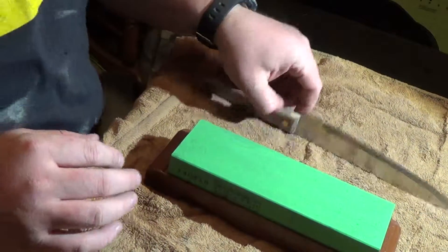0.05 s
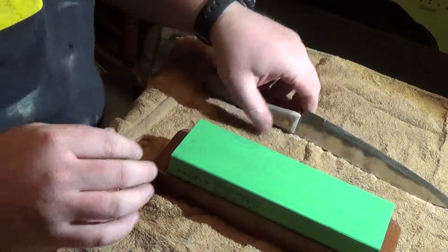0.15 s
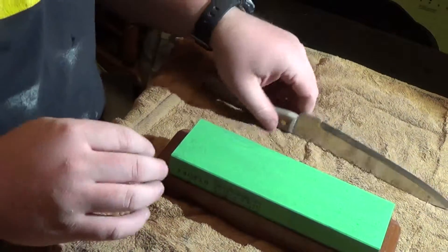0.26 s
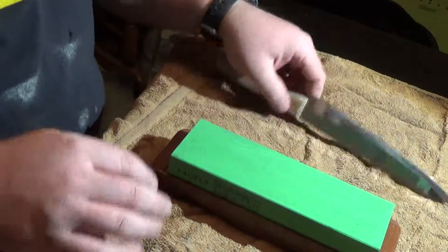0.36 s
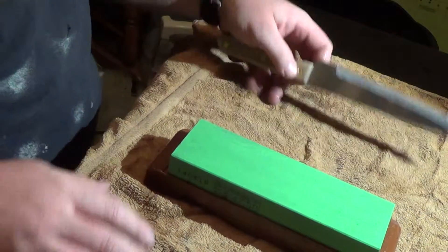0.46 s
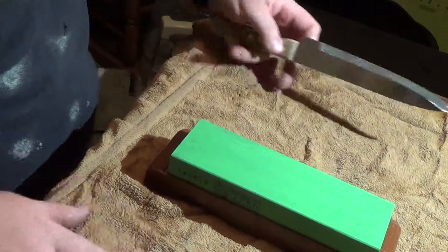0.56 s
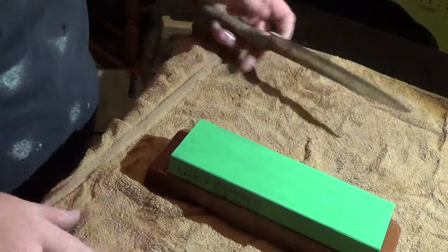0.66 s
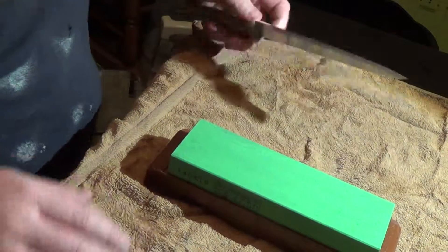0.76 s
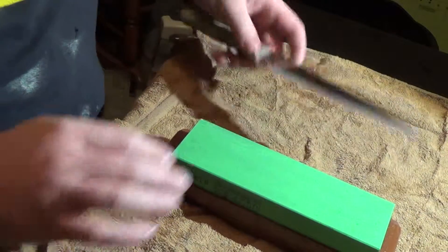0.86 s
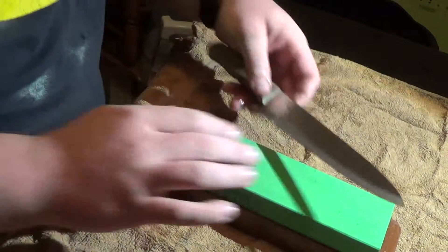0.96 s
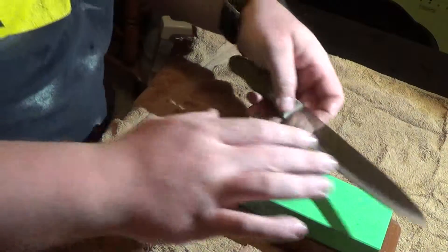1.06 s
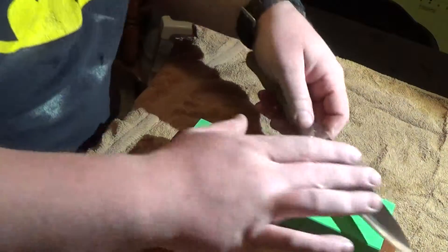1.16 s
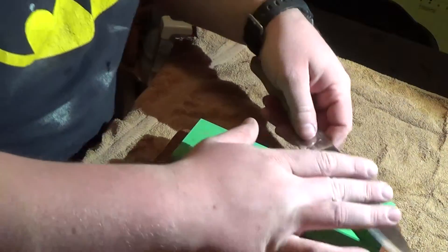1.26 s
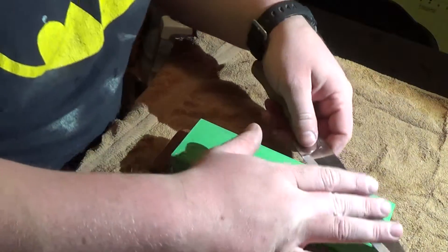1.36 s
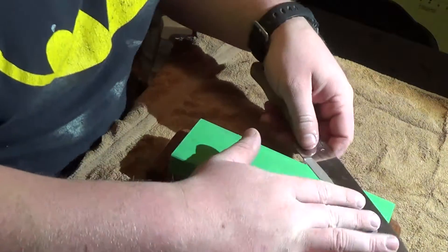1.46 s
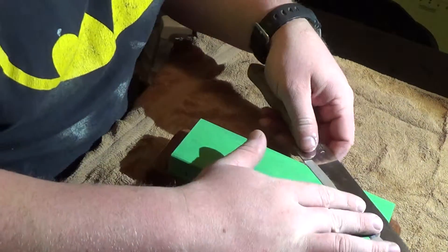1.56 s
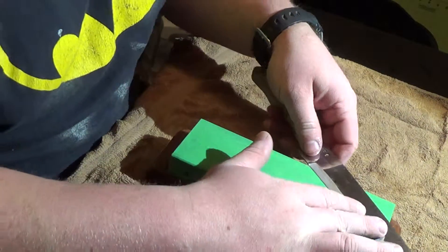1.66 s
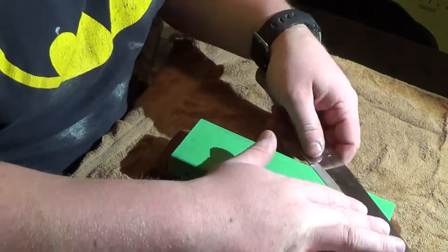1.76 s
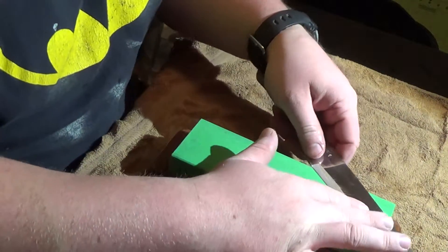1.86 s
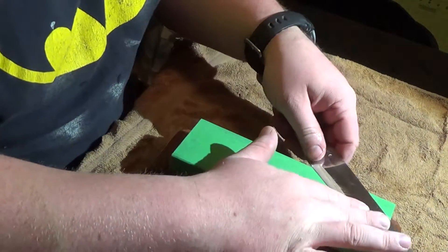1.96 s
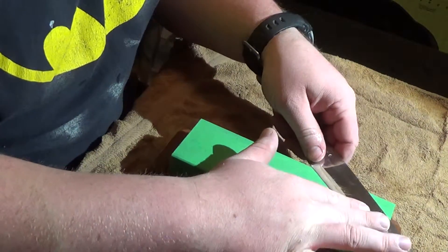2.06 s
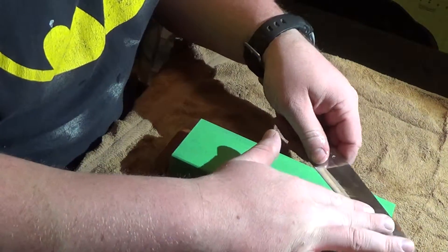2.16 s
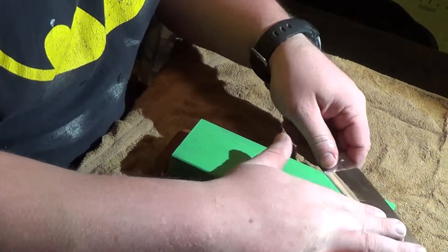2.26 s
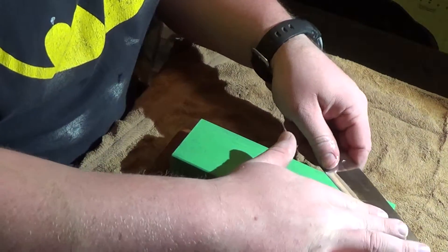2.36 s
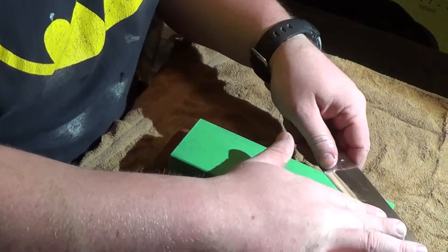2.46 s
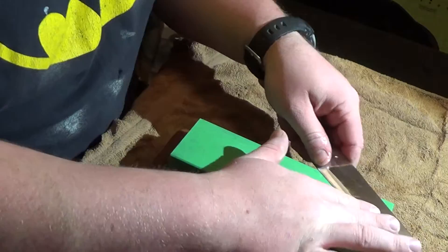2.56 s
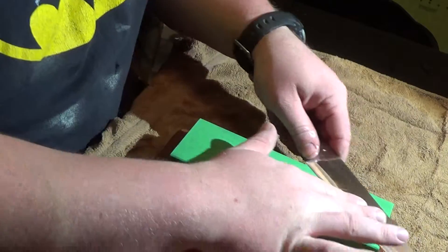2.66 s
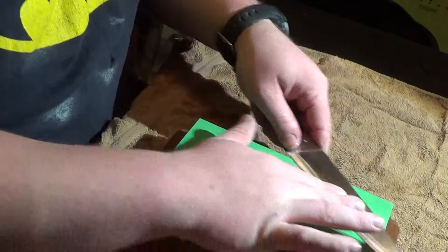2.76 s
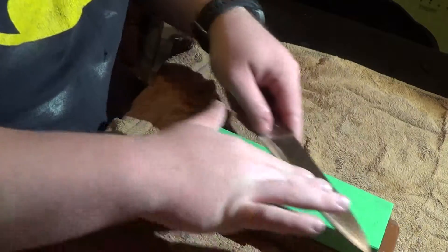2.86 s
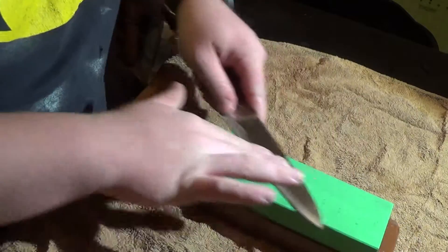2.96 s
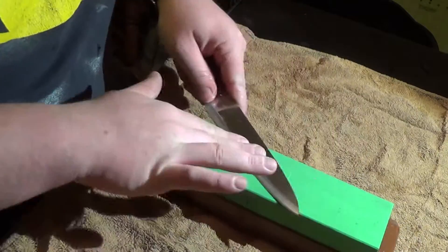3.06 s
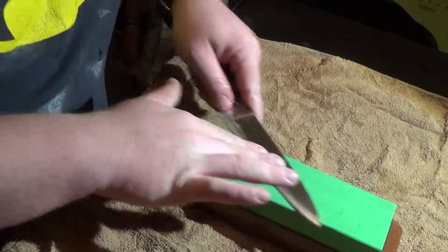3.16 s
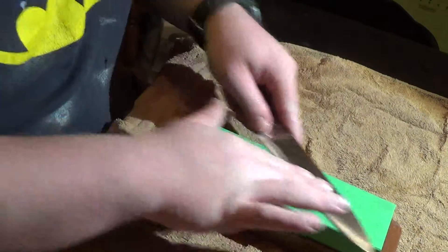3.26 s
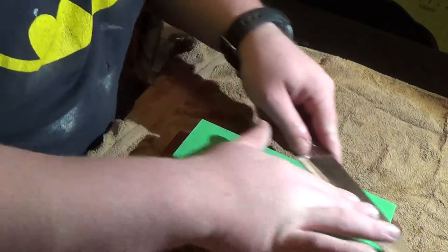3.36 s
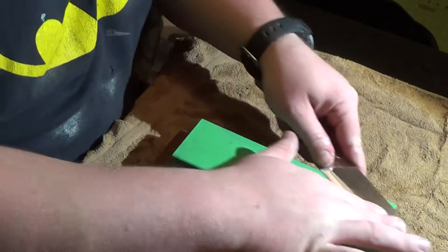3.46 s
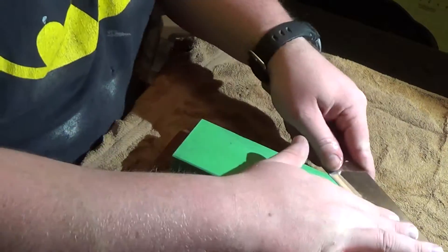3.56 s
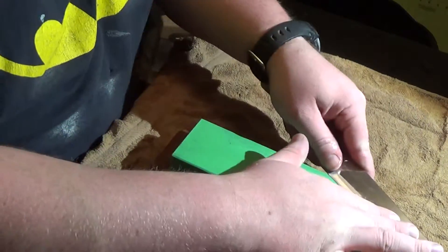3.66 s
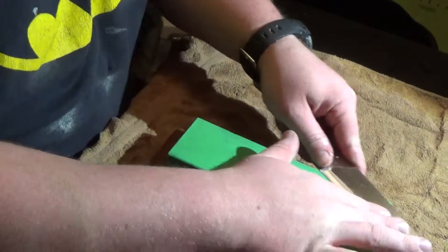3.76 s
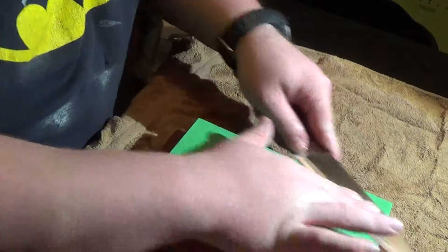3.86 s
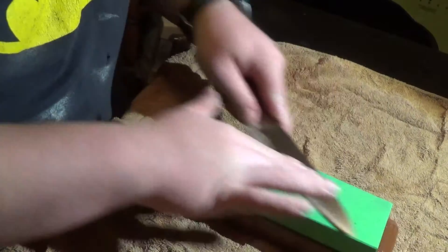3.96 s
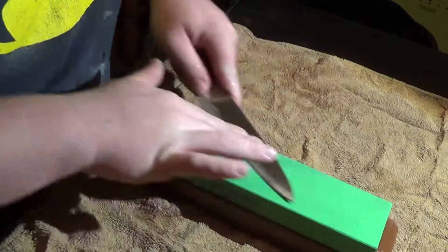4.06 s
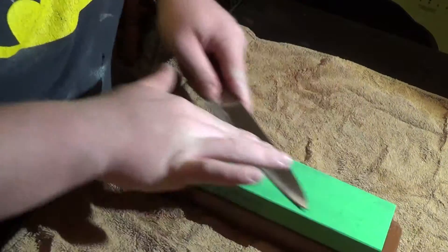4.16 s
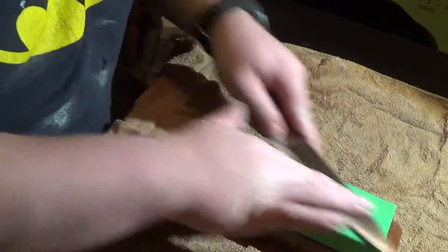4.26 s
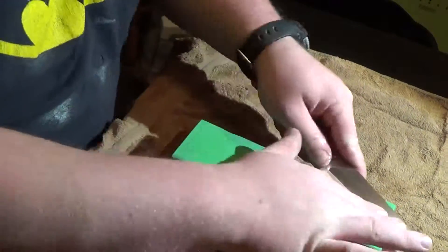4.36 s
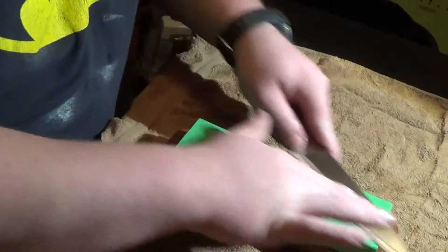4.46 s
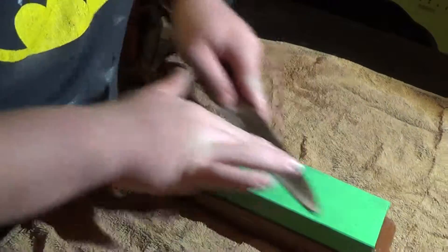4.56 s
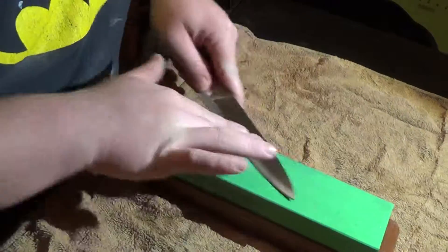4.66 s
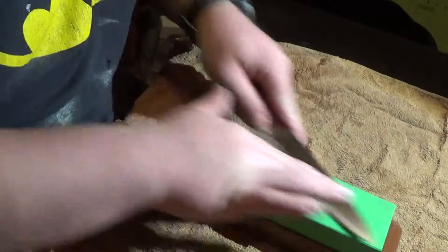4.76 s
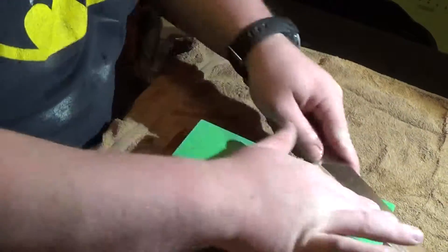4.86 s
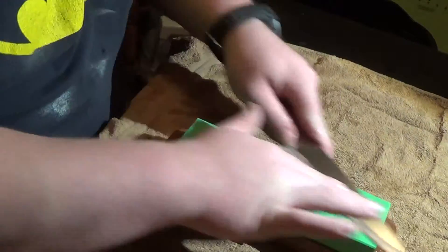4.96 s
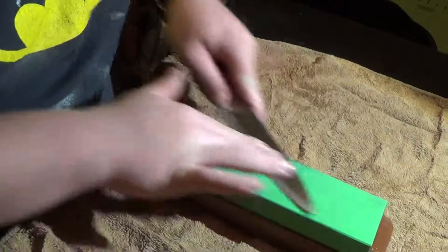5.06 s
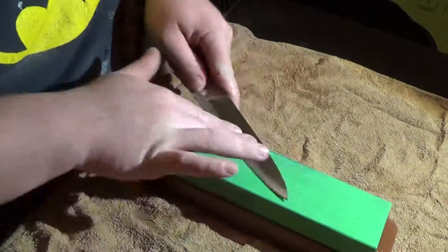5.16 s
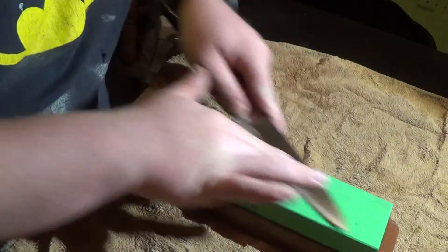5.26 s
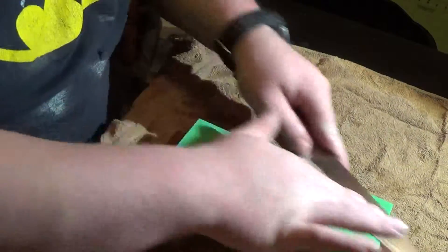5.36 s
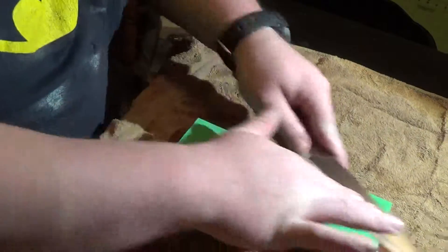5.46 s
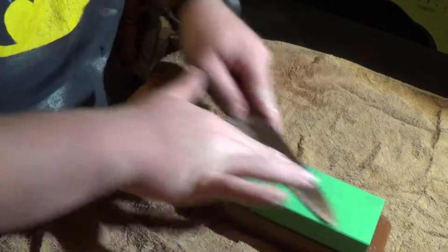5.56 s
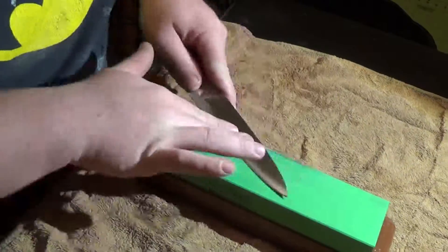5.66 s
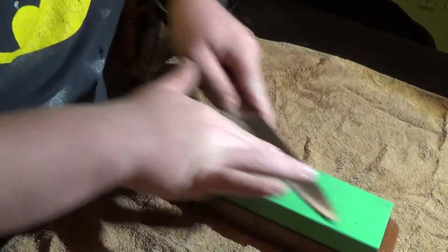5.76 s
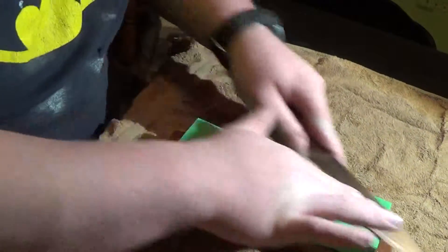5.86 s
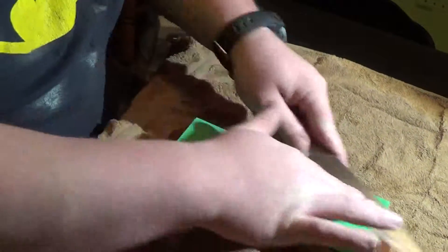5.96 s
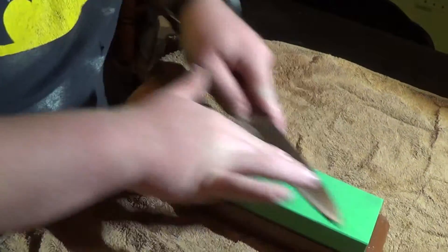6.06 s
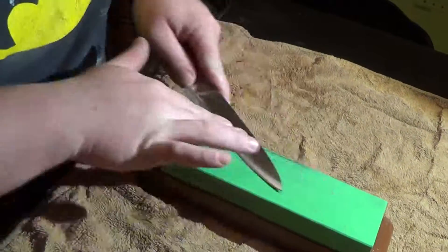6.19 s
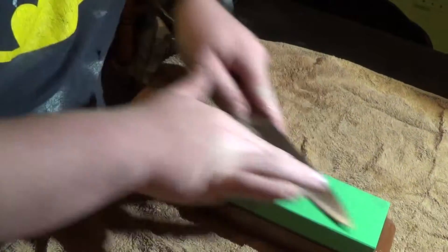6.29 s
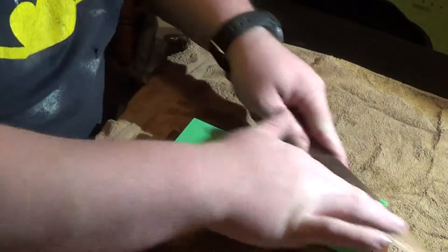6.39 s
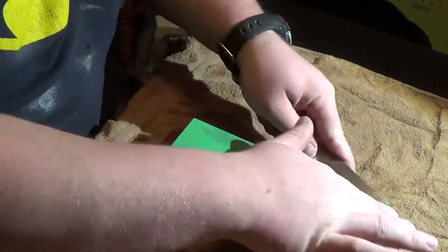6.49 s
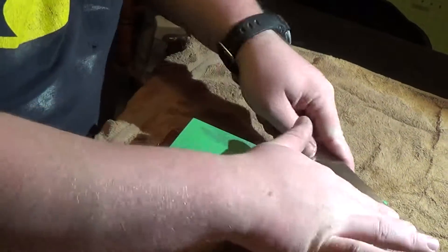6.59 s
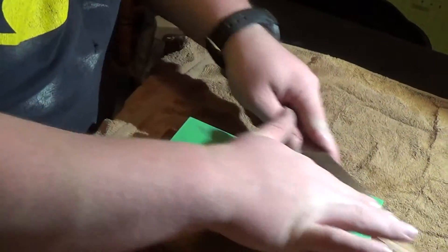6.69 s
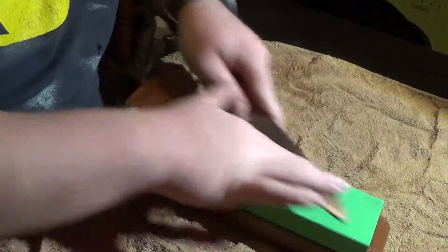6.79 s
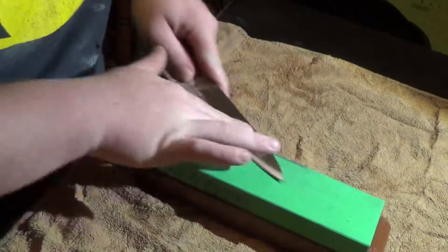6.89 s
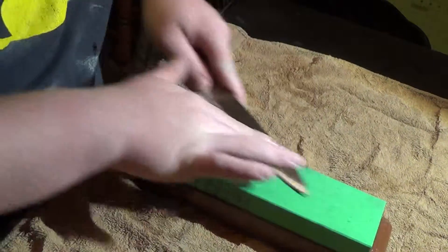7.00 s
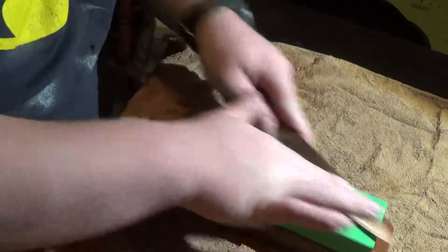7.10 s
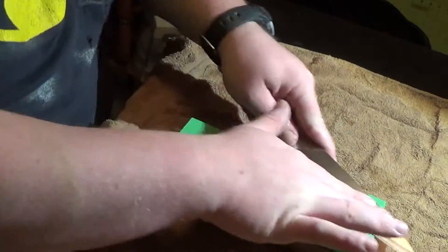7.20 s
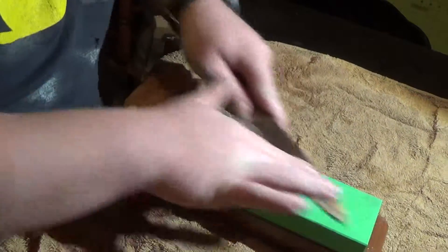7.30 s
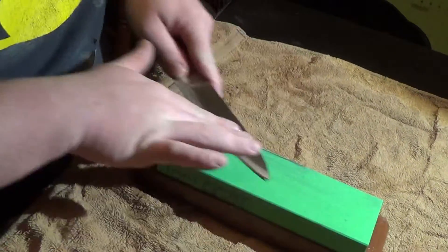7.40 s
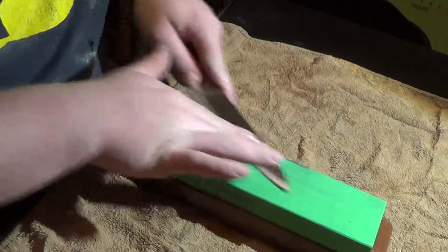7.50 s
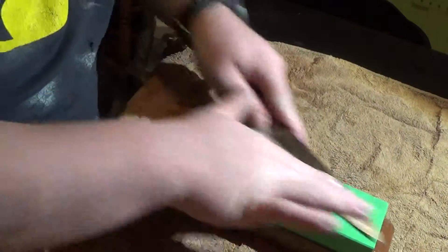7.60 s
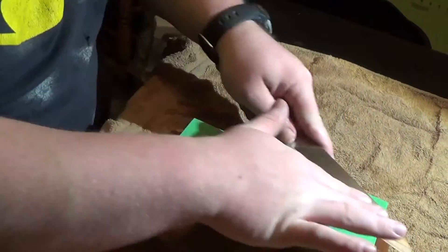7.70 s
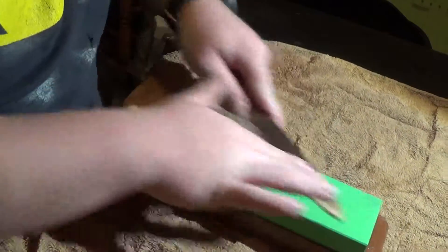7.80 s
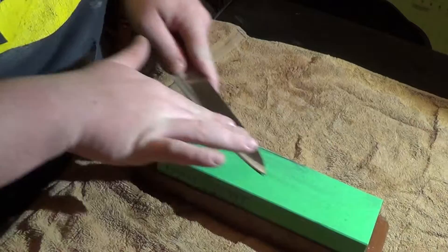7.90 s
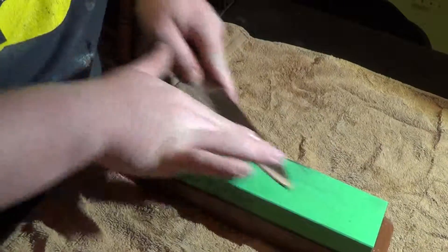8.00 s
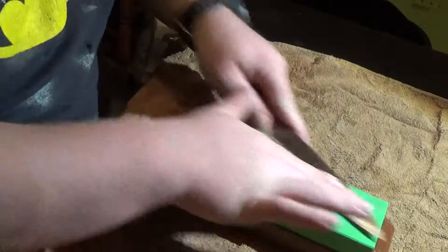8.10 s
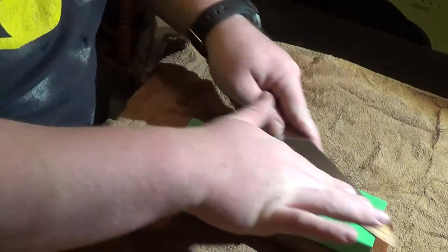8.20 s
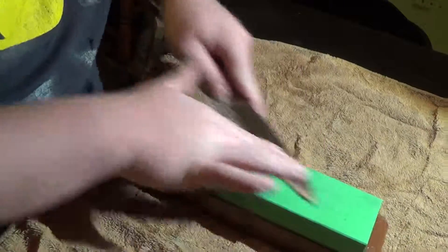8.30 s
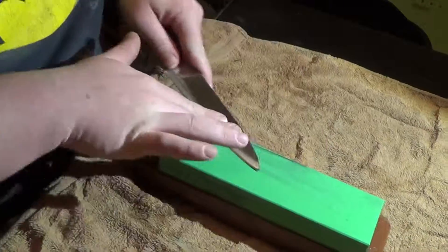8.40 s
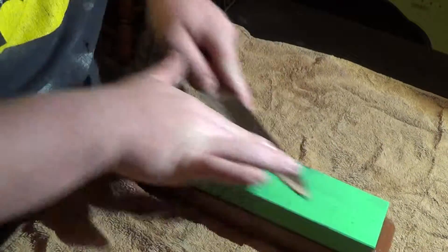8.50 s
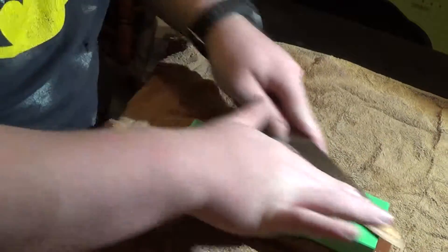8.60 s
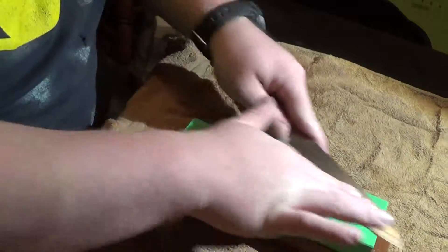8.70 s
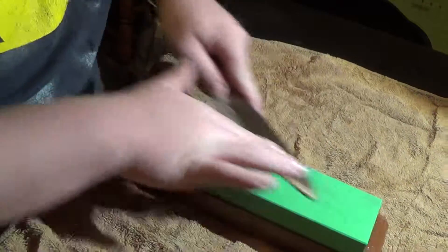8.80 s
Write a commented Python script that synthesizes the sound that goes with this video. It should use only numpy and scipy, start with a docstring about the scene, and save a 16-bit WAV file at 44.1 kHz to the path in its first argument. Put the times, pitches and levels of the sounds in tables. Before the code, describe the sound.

Quiet cloth brushing and small metallic ticks come first, then a hard, short clack of blade on stone. A few long, swelling rasps follow with gaps between them, then brisk, regular back-and-forth scraping over coarse grit. The steel hisses and rings drily, its tone sliding up and down, with low stone rumble and occasional light knocks beneath. Close microphone, small room with a short reflection and low hum.

```python
"""A small room with a low hum, close to the microphone: a kitchen knife is lifted off a towel, set on a
coarse whetstone with a clack and stroked back and forth, slowly, then twice a second.
Noise of fracturing grit scrapes the steel; the blade's resonances glide as the contact travels between
heel and tip. Coloured noise makes the rumble of stone and table; damped sines make the clack.
The walls answer with a short tail of decaying noise."""
import sys
import numpy as np
from scipy import signal
from scipy.fft import rfft, irfft, next_fast_len
from scipy.io import wavfile
from scipy.ndimage import uniform_filter1d, map_coordinates

SR = 44100
rng = np.random.default_rng(int(sys.argv[2]) if len(sys.argv) > 2 else 0)


def unload_audio(sound):
    """Save the sound as a 16-bit wav file, at the path given as the first command line argument."""
    columns = np.transpose(np.atleast_2d(sound))
    # keep every value between -1 and 1, then stretch to whole-number steps
    steps = np.round(np.clip(columns, -1, 1) * 32767)
    wavfile.write(sys.argv[1], SR, steps.astype(np.int16))


N = 389844


def amp(db):
    """Decibels to gain."""
    return 10 ** (np.asarray(db) / 20)


def unit(x):
    """Scaled to rms 1."""
    return x / np.sqrt(np.mean(x ** 2) + 1e-20)


def along(points, hz):
    """(frequency, value) points read on a log frequency axis."""
    f, v = np.transpose(points)
    return np.interp(np.log(hz + 1), np.log(f + 1), v)


def curves(rows):
    """One value per sample for each column after the time."""
    rows = np.asarray(rows)
    in_order = rows[np.argsort(rows[:, 0], kind="stable")]
    s, *cols = in_order.T
    return [np.interp(np.arange(N) / SR, s, c) for c in cols]


def wobble(rate):
    """A smooth random curve, rate knots a second."""
    knots = rng.standard_normal(int(N * rate / SR) + 4)
    return map_coordinates(knots, [np.arange(N) * rate / SR])


def filtered(x, response):
    """x times a response of frequency."""
    m = next_fast_len(N + 8192)
    return irfft(rfft(x, m) * response(np.fft.rfftfreq(m, 1 / SR)), m)[..., :N]


def coloured(spectrum):
    """Noise of rms 1 with the given spectrum."""
    return unit(filtered(rng.standard_normal(N), lambda hz: amp(along(spectrum, hz))))


def levelled(x):
    """x with its slow swells evened out to rms 1 over about 50 ms."""
    return x / np.sqrt(np.abs(uniform_filter1d(x ** 2, size=2200)) + 1e-12)


def band(x, low_hz, high_hz):
    """One steep-sided band of x at a steady rms of 1."""
    return levelled(filtered(x, lambda hz: 1 / (1 + (hz / high_hz) ** 24) - 1 / (1 + (hz / low_hz) ** 24)))


def add(track, s, sound):
    """Mix a short sound into the track at time s."""
    part = track[round(s * SR):][:len(sound)]
    part += sound[:len(part)]


def ramp(t, length):
    """A quarter sine from 0 to 1 over the given length."""
    return np.sin(np.pi / 2 * np.clip(t / length, 0, 1))


def swells(rows):
    """Smooth rises and falls: one gain curve for each dB column after start and length."""
    out = np.zeros((len(rows[0]) - 2, N))
    for s, length, *levels_db in rows:
        arch = np.sin(np.linspace(0, np.pi, round(length * SR)))
        for track, db in zip(out, levels_db):
            add(track, max(s, 0), amp(db) * arch)
    return out


def room(x):
    """The walls answer each side differently, each frequency dying at its own speed."""
    # decay of the tail: (frequency [Hz], time to fall 60 dB [s])
    decay_times = [(150, 0.15), (600, 0.24), (3500, 0.26), (10000, 0.3), (16000, 0.4)]
    # colour of the reflections: (frequency [Hz], relative level [dB])
    wall_colour = [(40, -26), (120, -19.5), (300, 0), (1400, -0.5), (3000, -7), (6000, -6), (9000, -10.5),
                   (16000, -54)]
    hz, t, z = signal.stft(rng.standard_normal((2, SR // 2)), SR, nperseg=256)
    decay = amp(-60 * t / along(decay_times, hz)[:, None])
    tail = signal.istft(z * decay, SR, nperseg=256)[1]
    tail = tail / np.linalg.norm(tail[0])
    delayed = np.pad(x, (300, 0))[None]  # about 7 ms before the walls answer
    wet = signal.fftconvolve(delayed, tail, axes=1)[:, :N]
    return filtered(wet, lambda f: amp(along(wall_colour, f)))


def background():
    """Room air, a machine's low hum as a slightly unsteady sine, and a faint electronic whine."""
    # hum: (time [s], rms level before a 2.5 dB cut [dB])
    hum_level = [(0.0, -50.5), (0.57, -45.5), (1.08, -54), (1.75, -51.5), (2.39, -70), (8.84, -54)]
    # colour of the room air: (frequency [Hz], relative level [dB])
    air_colour = [(12, -37), (20, -1), (62, -6.5), (164, -12), (733, -18), (796, -17.5), (865, -20),
                  (1050, -19.5), (1350, -18), (2100, -21), (15000, -31)]
    t = np.arange(N) / SR
    hum_gain = amp(curves(hum_level)[0] - 2.5) * np.sqrt(2)
    hum = hum_gain * np.sin(2 * np.pi * 43.1 * t + 0.13 * wobble(5))
    whine = amp(-66) * np.sin(2 * np.pi * 15735 * t)
    air = amp(-54) * coloured(air_colour)
    return hum + whine + air + room(air)


def handling():
    """The knife leaves the towel and slides in the fingers: swells of two noise colours."""
    # knife and hands brush the towel: (start [s], length [s], level [dB])
    rustles = [(0, 0.15, -63), (.28, 0.56, -56.5), (.645, .06, -52), (1.1, 0.35, -59)]
    # fingers slide on the steel: (start [s], length [s], level [dB])
    slips = [(0, .14, -60.5), (.24, 0.13, -63), (.5, 0.27, -56.5), (.82, 0.059, -51), (.95, 0.11, -51)]
    # colour of the towel: (frequency [Hz], relative level [dB])
    towel_colour = [(150, -5), (400, 2), (1500, -2), (2500, -3), (5000, -12), (11000, -21), (16000, -27)]
    # colour of skin on steel: (frequency [Hz], relative level [dB])
    slide_colour = [(3000, -40), (7000, -12), (9000, 2), (11500, -3), (14000, -16), (16000, -21)]
    unsteady = amp(1.5 * wobble(91.2))
    brushing = swells(rustles)[0] * coloured(towel_colour)
    sliding = swells(slips)[0] * coloured(slide_colour)
    return unsteady * (brushing + sliding)


def taps(rows, sharpness):
    """Light contacts: short bursts of noise around one pitch."""
    out, t = np.zeros(N), np.arange(SR // 4) / SR
    for s, db, hz, t60 in rows:
        burst = rng.standard_normal(len(t)) * amp(-60 * t / t60)
        tap = signal.lfilter(*signal.iirpeak(hz, sharpness, SR), burst)
        add(out, s, amp(db) * tap / np.abs(tap).max())
    return out


def knocks(crack_db, crack_t60, chatter_db, chatter_t60):
    """The blade hits the stone: modes damped by the hand, a crack, and brief chatter on the grit."""
    # blows on the stone: (time [s], peak level [dB], tilt below 3 kHz [dB], tilt above 5 kHz [dB])
    blows = [(1.378, -7.5, -1.5, 3), (4.384, -13, -9, -15), (4.404, -12.5, 0, 1), (4.913, -17, -3, 2),
             (7.211, -20, -25, -18), (7.712, -19.5, -27, 16)]
    # struck blade on its stone: (frequency [Hz], level before the tilts [dB], time to fall 60 dB [s])
    struck_modes = [(330, -21, .04), (425, -17, .07), (700, -22, .025), (1050, -15, .025), (1500, -15, .03),
                    (1900, -9, .025), (2143, -5, .028), (2420, -7, .025), (2750, -9, .025), (3817, 0, .028),
                    (4064, -5, .02), (4753, -3, .025), (5800, -5, .02), (7300, -12, .02),
                    (10400, -13, .025)]
    out, t = np.zeros(N), np.arange(SR // 2) / SR
    hz, level, t60 = np.transpose(struck_modes)[:, :, None]
    crack_filter = signal.butter(2, 7940, fs=SR)  # the crack dulls above this frequency
    for s, db, low_db, bright_db in blows:
        tilt = low_db * (hz < 3000) + bright_db * (hz > 5000)
        strength = amp(level + tilt + rng.normal(0, 1, hz.shape))
        tones = np.sin(2 * np.pi * (hz * t + rng.random(hz.shape)))
        ring = np.sum(strength * amp(-60 * t / t60) * tones, axis=0)
        chatter = amp(chatter_db - 60 * t / chatter_t60) * rng.standard_normal(len(t))
        crack_noise = signal.lfilter(*crack_filter, rng.standard_normal(len(t)))
        crack = amp(crack_db - 60 * t / crack_t60) * crack_noise
        hit = ring + signal.fftconvolve(ring, chatter)[:len(t)] + crack
        add(out, s, amp(db) * hit / np.abs(hit).max())
    return out


def hand():
    """Every stroke speeds up, runs its course and stops; speed and pressure set the gains and the pitch."""
    # The main bending mode rises as less steel overhangs the stone, and falls again on the way back.
    # pulls towards the body: (start [s], length [s], attack [s], release [s], hiss [dB], ring [dB],
    # drag [dB], growth of pressure [dB], mode from [Hz], mode to [Hz], glide lag [power])
    pulls = [(1.52, .33, 0.19, 0.22, -49.5, -45, -57, -10, 4150, 4800, 0.95),
             (2.525, 0.61, 0.58, 0.16, -21, -21, -47.5, 5, 2470, 4010, 1.24),
             (3.755, 0.42, 0.29, 0.16, -22, -23.5, -48.5, 7, 2380, 3940, 0.92),
             (4.43, .268, 0.091, 0.043, -20, -24, -47, 0, 2100, 4600, 0.81),
             (4.948, 0.26, 0.12, 0.057, -18.5, -23.5, -46.5, 0.5, 2220, 4850, 0.88),
             (5.47, 0.27, 0.04, .045, -21, -26, -48.5, 1.5, 2160, 4680, 0.72),
             (5.972, .27, 0.086, 0.036, -20.5, -27, -49, -3, 2120, 5160, .95),
             (6.664, .321, 0.17, 0.026, -23, -26.5, -51.5, -8.5, 2530, 5300, 1.22),
             (7.228, 0.27, 0.027, 0.041, -20.5, -26.5, -52, 3.5, 2600, 6270, 1.35),
             (7.73, 0.27, 0.036, 0.026, -22, -29, -52, 3.5, 2700, 6330, 1.17),
             (8.217, 0.25, 0.054, 0.035, -21.5, -26.5, -52, 8, 2500, 6400, 1.26),
             (8.707, 0.22, 0.047, 0.034, -22, -28, -51.5, -4.5, 2460, 6500, 1.5)]
    # pushes away from the body: same columns and units as the pulls
    pushes = [(1.38, 0.15, 0.028, 0.055, -41.5, -38.5, -58, 3, 3750, 3730, 1),
              (2.11, 0.26, 0.24, .12, -26, -28, -51.5, 18, 2500, 2550, 1),
              (3.13, 0.49, 0.031, 0.23, -19, -21.5, -46, 8, 4100, 2430, 0.67),
              (4.17, .267, 0.012, 0.034, -19, -26.5, -46, 3.5, 3770, 2068, 0.97),
              (4.697, .26, 0.013, 0.089, -20, -27, -46.5, 2, 4430, 2210, 0.89),
              (5.207, .27, 0.028, 0.042, -18, -25.5, -51, -2.5, 5300, 2346, 0.95),
              (5.732, .25, .018, 0.04, -18.5, -26, -48.5, 2, 4260, 2260, 0.89),
              (6.239, 0.28, 0.016, 0.094, -22.5, -29.5, -48.5, 0, 5060, 2100, 0.86),
              (6.983, 0.25, .012, 0.03, -23.5, -31.5, -52.5, 0, 5530, 2450, 0.98),
              (7.497, 0.24, .014, 0.031, -18, -26, -50, 0, 6360, 2530, 0.93),
              (7.995, 0.24, 0.011, 0.12, -21.5, -28, -50, -7, 6660, 2440, 1.02),
              (8.466, 0.26, 0.021, 0.033, -20, -27, -52, -3, 7080, 2520, 1.11)]
    # course of every pull: (share of the stroke [0-1], share of the travel [0-1], hiss [dB], ring [dB],
    # grinding [dB], rumble [dB])
    pull_course = [(0, 0, -6, 0, 8, -0.5), (.2, 0.214, -2.5, 1, 3, -3), (.4, 0.684, -2.5, 0.5, -2, -9.5),
                   (.6, 0.92, 0, -1.5, -2.5, -5), (.8, .98, 0.5, -4, -3, -7), (1, 1, -10, -7.5, 0.5, -4)]
    # course of every push: same columns and units
    push_course = [(0, 0.18, -9.5, -5, -5, 0.5), (0.132, 0, -1.5, -1.5, -.5, -3),
                   (.33, 0.5, -2.5, -5, -2.5, -6), (.48, .79, -9.5, -6, 0.5, -8.5),
                   (.67, 0.97, -12.5, -9.5, 2, -4), (.84, .99, -11, -8.5, 1.5, -4.5),
                   (1, 0.97, -20, -13, 2, -2.5)]
    grind_law, rumble_law = 0.46, 0.35  # powers of the hand's speed; hiss and ring are proportional to it
    brisk_s, jerk_law = 0.24, 0.92  # a stroke longer than this shakes the table less, by this power
    gains, bending = np.zeros((4, N)), []
    for rows, course in ((pulls, pull_course), (pushes, push_course)):
        shares, way, *columns = np.transpose(course)
        for s, length, attack, release, hiss_db, ring_db, drag_db, press_db, from_hz, to_hz, lag in rows:
            t = np.arange(round(length * SR)) / SR
            done = t / length
            travel = np.interp(done ** lag, shares, way)
            hiss, ring, grind, rumble = (np.interp(done, shares, c) for c in columns)
            speed = ramp(t, attack) * ramp(length - t, release)
            bite = speed * amp(press_db * (done - .5))
            jerk = min(1, brisk_s / length) ** jerk_law
            layers = (bite * amp(hiss_db + hiss),
                      bite * amp(ring_db + ring),
                      speed ** grind_law * amp(drag_db + grind),
                      jerk * speed ** rumble_law * amp(drag_db + rumble))
            for track, layer in zip(gains, layers):
                add(track, s, layer)
            glide_hz = from_hz + (to_hz - from_hz) * travel
            bending.append(np.column_stack([s + t, glide_hz])[::64])
    return (*gains, curves(np.vstack(bending))[0])


def blade(force, bending):
    """The force heard through the blade's resonances, which shift with the overhang."""
    # four bending modes, one a row: (frequency [Hz] at each of five overhangs, long to short)
    mode_paths = [(800, 1150, 1550, 2200, 3050), (2250, 2600, 3400, 4600, 6500),
                  (4550, 4650, 5050, 6600, 8800), (5700, 6000, 6800, 8900, 11800)]
    # how each bending mode sounds, before the contrast: (width [Hz], level at long overhang [dB],
    # level at short overhang [dB], extra while the tip is worked [dB])
    mode_shapes = [(120, 18, -6, 3), (200, 18, 11, 1), (220, 18, 5, 1), (300, 14, 3, 2)]
    # resonances that stay put, before the contrast: (frequency [Hz], width [Hz],
    # level at long overhang [dB], level at short overhang [dB], extra while the tip is worked [dB])
    steady_modes = [(1580, 80, 17.5, -4.5, 1), (1820, 31, 22, -7, -11), (3100, 220, -33.5, 3.5, 5.5),
                    (3650, 560, 26.5, -4.5, -2), (4620, 220, 21, -2, 1.5), (5990, 680, 20.5, 3, -5),
                    (10440, 860, 13.5, 20.5, -7)]
    tip_from_s, contrast = 6.6, 1.2  # contrast is a power on the resonances
    flicker_db, patchy_db, ripple_db = 2.2, 2.0, 1.7  # flicker is before the contrast
    hz, t, z = signal.stft(force, SR, nperseg=512, noverlap=384)
    hz = hz[:, None]
    main = uniform_filter1d(np.interp(t, np.arange(N) / SR, bending), size=7)
    main_path = mode_paths[1]
    shortness = np.interp(main, main_path, np.linspace(0, 1, len(main_path)))

    def peak(centre, width, long_db, short_db, tip_db):
        """One resonance, its strength set by where the edge touches and flickering at random."""
        db = long_db + (short_db - long_db) * shortness + tip_db * (t > tip_from_s)
        db = db + flicker_db * unit(uniform_filter1d(rng.standard_normal(len(t)), size=12))
        return amp(db) ** 2 / (1 + (2 * (hz - centre) / width) ** 2)

    power = 1
    for path, shape in zip(mode_paths, mode_shapes):
        power = power + peak(np.interp(main, main_path, path), *shape)
    for mode in steady_modes:
        power = power + peak(*mode)
    power = power ** contrast
    # the resonances redistribute the energy; the broad colour stays that of the force
    power /= uniform_filter1d(power.mean(axis=1), size=15)[:, None]
    # countless weaker modes form a ripple that slides up with them
    ripple = map_coordinates(rng.standard_normal(128), [hz / (260 * (1 + .5 * shortness))])
    # small random patches of louder and softer, in time and frequency
    patches = uniform_filter1d(rng.standard_normal(z.shape), size=4, axis=0)
    patches = uniform_filter1d(patches, size=10, axis=1)
    gain = np.sqrt(power) * amp(ripple_db * ripple + patchy_db * unit(patches))
    return signal.istft(z * gain, SR, nperseg=512, noverlap=384)[1][:N]


def stone(grind_gain, rumble_gain, bending):
    """The drag, as coloured noise, drives the blade's low resonances and shakes the stone and table."""
    # the stone judders on the table: (start [s], length [s], grinding [dB], rumble [dB])
    judders = [(2.21, 0.14, -42, -69), (3.17, 0.067, -51, -55), (4.36, 0.085, -34.5, -46),
               (4.63, .06, -44, -46), (4.88, 0.092, -43.5, -48), (5.41, 0.054, -45.5, -48),
               (5.65, 0.06, -41, -42), (5.92, 0.079, -47, -47), (6.39, 0.059, -49, -57),
               (7.07, 0.052, -47, -46), (7.92, 0.078, -50.5, -51.5), (8.42, .16, -55, -50.5)]
    # colour of the drag: (frequency [Hz], relative level [dB])
    drag_colour = [(29, -37), (50, -10), (92, -1.5), (155, 1.5), (257, -10), (318, -5), (393, -13.5),
                   (434, -7.5), (546, -11), (592, -13.5), (821, -9), (1740, -8.5), (2500, -0.5), (3250, 4),
                   (5500, -120)]
    grind_judder, rumble_judder = swells(judders)
    drag = coloured(drag_colour)
    grind_level = np.hypot(grind_gain, grind_judder) * amp(0.96 * wobble(60))
    grind = grind_level * band(blade(drag, bending), 443, 2298)
    rumble_level = np.hypot(rumble_gain, rumble_judder) * amp(2.6 * wobble(40))
    rumble = rumble_level * band(drag, 30, 430)
    return grind + rumble


def grit(clump_db, catch_rate):
    """Countless tiny fractures in clumps, and now and then a larger grain that catches."""
    fine = unit(rng.standard_normal(N) * amp(clump_db * wobble(700)))
    catches = (rng.random(N) < catch_rate / SR) * rng.uniform(-5.5, 5.5, N)
    return fine + catches


def strokes(hiss_gain, ring_gain, bending):
    """The edge scrapes over the grit: fractures excite the blade, split into a ring and a hiss above it."""
    # the edge digs in briefly: (start [s], length [s], ring [dB])
    digs = [(2.21, .1, -32), (5.07, 0.093, -21.5), (5.225, 0.075, -22), (5.415, 0.039, -28),
            (6.57, 0.055, -49.5), (7.2, 0.031, -26.5), (7.7, 0.032, -24.5), (7.745, 0.057, -24),
            (8.33, 0.017, -27)]
    # slow strokes are duller than most fast ones: (time [s], top sizzle against the hiss [dB])
    pace = [(2.3, -12), (3.3, -12.5), (4.3, -9.5), (8.8, -11.5)]
    # colour of the scraped steel: (frequency [Hz], relative level [dB])
    steel_colour = [(880, -53), (1500, -22), (2120, -18.5), (3710, -4), (4140, -6.5), (4660, -4.5),
                    (5450, -9), (6570, -6.5), (7700, -15.5), (9560, -6.5), (10400, -3.5), (12000, -4),
                    (15800, -16.5)]
    scraped = blade(grit(clump_db=1, catch_rate=55), bending)
    scraped = filtered(scraped, lambda hz: amp(along(steel_colour, hz)))
    ring = np.hypot(ring_gain, swells(digs)[0]) * band(scraped, 2037, 7800)
    sizzle = amp(curves(pace)[0]) * band(scraped, 11800, 18000)
    hiss = hiss_gain * (band(scraped, 8020, 11950) + sizzle)
    return amp(0.62 * wobble(70)) * (ring + hiss)


def scene():
    """All sources sit close in front of the microphone, in the answering room."""
    # small ticks of handle and edge: (time [s], peak level [dB], pitch [Hz], time to fall 60 dB [s])
    ticks = [(.537, -34.5, 2370, .03), (.538, -34, 10000, 0.011), (.656, -33, 1440, 0.046),
             (.657, -31, 2500, 0.026), (1.555, -40, 6570, .012), (1.865, -30, 8300, 0.0089),
             (1.943, -41, 6300, .01), (2.010, -30.5, 5850, 0.0072), (6.693, -40, 9000, 0.013)]
    # soft bumps of the hand on the table: (time [s], peak level [dB], pitch [Hz], time to fall 60 dB [s])
    bumps = [(.458, -36, 137, 0.015), (.575, -39, 125, 0.038), (.592, -37.5, 85, 0.18),
             (4.41, -36, 142, 0.031), (4.94, -45, 100, .1)]
    hits = knocks(crack_db=1, crack_t60=0.019, chatter_db=-35.5, chatter_t60=0.21)
    hits = hits + taps(ticks, sharpness=7.5) + taps(bumps, sharpness=3.2)
    hiss, ring, grind, rumble, bending = hand()
    rubbing = strokes(hiss, ring, bending) + stone(grind, rumble, bending) + handling()
    direct = (hits + rubbing) * amp([[-.1], [.1]])  # left, right
    reflected = room(amp(-7.5) * rubbing + amp(-5.0) * hits)
    return direct + reflected + background()


def record(dry):
    """Nothing is kept from 16 kHz up."""
    return filtered(dry, lambda hz: hz < 16000)


dry = scene()
out = record(dry)
unload_audio(out)
```